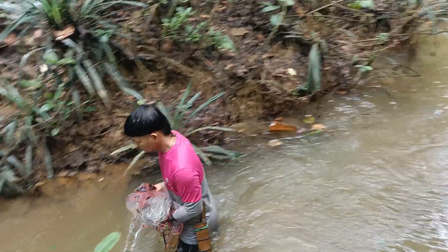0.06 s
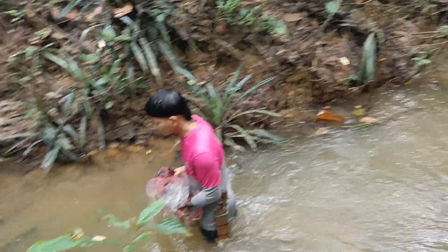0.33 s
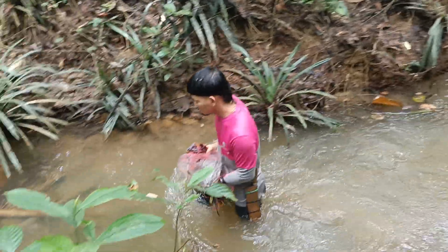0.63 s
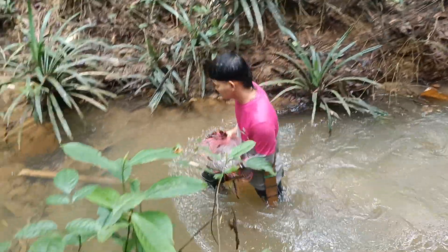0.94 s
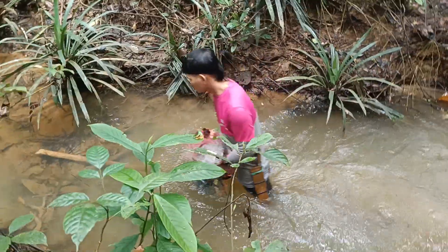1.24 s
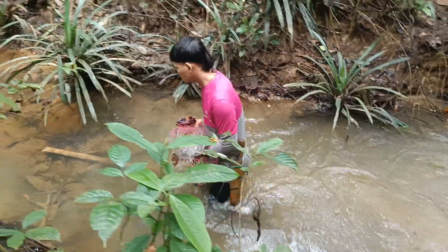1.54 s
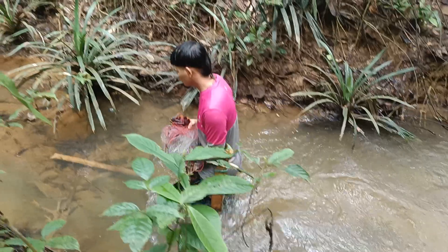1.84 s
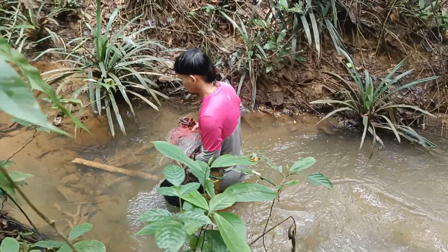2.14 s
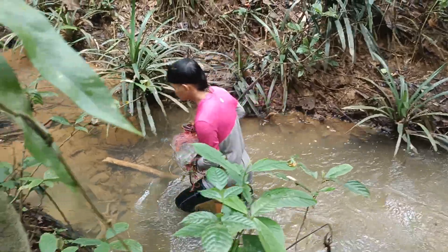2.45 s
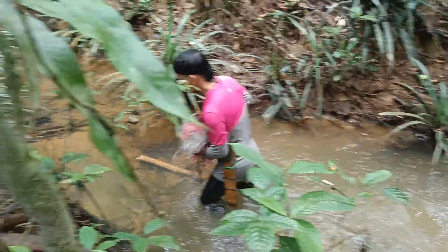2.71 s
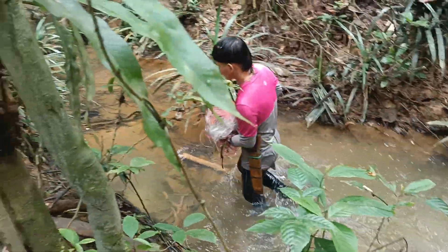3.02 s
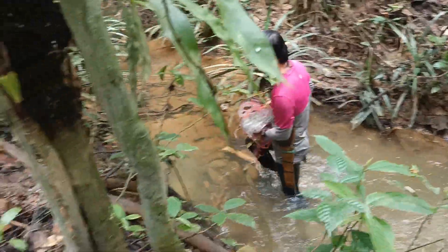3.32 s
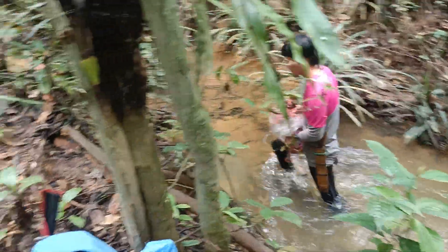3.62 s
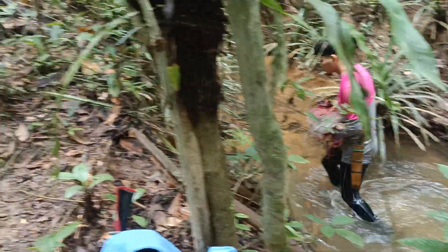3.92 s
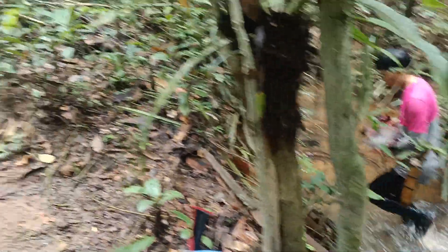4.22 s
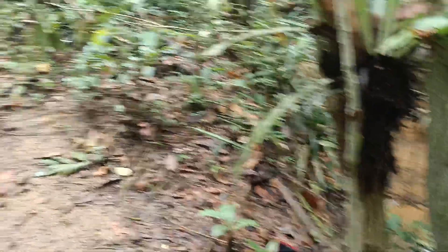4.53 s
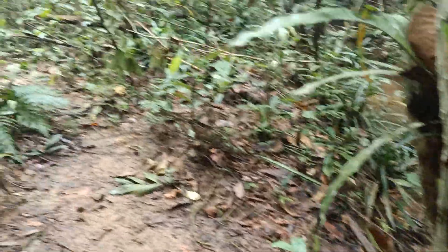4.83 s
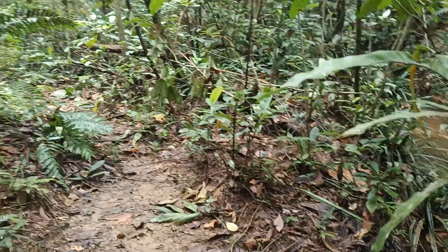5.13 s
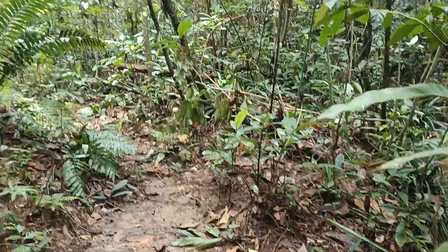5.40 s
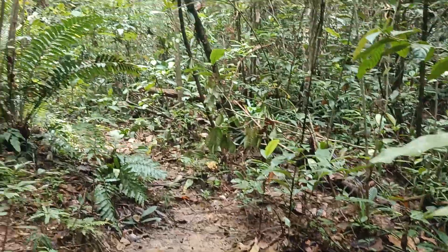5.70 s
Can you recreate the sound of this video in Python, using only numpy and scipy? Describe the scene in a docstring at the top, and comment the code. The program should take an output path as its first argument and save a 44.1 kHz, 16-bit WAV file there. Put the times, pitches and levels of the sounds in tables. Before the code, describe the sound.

Uneven splashing strides through shallow water over a steady insect buzz, followed by twigs and leaves knocking and brushing against the microphone.

```python
"""Sloshing steps come first: someone wades up a shallow forest stream while insects drone all around.
Each stride churns up large gurgling bubbles, small plinking ones and spray; two cicadas join in later.
We listen from a phone carried along the bank a few metres away. Its bearer treads softly,
then turns into the undergrowth, which taps and scrapes the phone."""
import sys
import numpy as np
from scipy import signal
from scipy.fft import rfft, irfft
from scipy.io import wavfile
from scipy.ndimage import uniform_filter1d, map_coordinates

SR = 44100
rng = np.random.default_rng(int(sys.argv[2]) if len(sys.argv) > 2 else 0)


def store_wav(level_fs):
    """Save 16-bit WAV to argv[1]."""
    pcm = np.round(np.clip(np.atleast_2d(level_fs), -1, 1) * 32767)
    wavfile.write(sys.argv[1], SR, pcm.T.astype(np.int16))


N = 254007
TIME = np.arange(N) / SR
FREQS = np.maximum(np.fft.rfftfreq(N, 1 / SR), 1)


def amp(db):
    """Turn decibels into a number to multiply by."""
    return 10 ** (np.asarray(db) / 20)


def pan(side_db):
    """Left and right gains; side_db says how much louder the left is."""
    gains = amp(np.array([[side_db], [-side_db]]) / 2)
    return gains / np.sqrt(np.mean(gains ** 2))


def over_hz(table, column=1):
    """Join the points of a table into a curve over all frequencies."""
    columns = np.transpose(table)
    return np.interp(np.log(FREQS), np.log(columns[0]), columns[column])


def shape(x, gain):
    """Turn each frequency up or down by its own gain."""
    return irfft(rfft(x) * gain, N)


def unit(x):
    """Scale a signal to an average power of 1."""
    return x / np.sqrt(np.mean(x ** 2))


def noise():
    """Separate hiss for left and right."""
    return rng.standard_normal((2, N))


def wander(rate_hz):
    """A smooth random wobble, about 1 in size."""
    return unit(shape(rng.standard_normal(N), np.exp(-(FREQS / rate_hz) ** 2)))


def add(out, start_s, sound):
    """Mix a sound in at the given time."""
    start = max(int(start_s * SR), 0)
    part = sound[..., :max(N - start, 0)]
    out[..., start:start + part.shape[-1]] += part


def ring(hz, decay_s, glide, attack):
    """A note that swells and dies away; a positive glide bends its pitch up."""
    age = np.arange(int(6 * decay_s * SR) + 2) / (decay_s * SR)  # counted in decay times
    swell = (1 - np.exp(-age / attack)) ** 2 * np.exp(-age)
    pitch_hz = hz * np.exp(glide * (age - 1))
    return swell / swell.max() * np.sin(2 * np.pi * np.cumsum(pitch_hz) / SR)


# How the phone's two microphones differ: pitch_hz, side_db, left_lead_radians
MIC_DIFFERENCES = [(300, 0, 0), (650, 0, .25), (880, 9, .5), (1080, 9, -.5), (1320, 5, 1.2), (1550, 2, 2.4),
                   (2100, -2, 2.3), (2800, -6, 1.8), (3400, 0, 1.3), (4200, 2, -1.4), (7000, 0, -2),
                   (12000, -4, -2)]


def two_mics(x):
    """The stream reaches each microphone with a different strength and timing."""
    tilt = amp(over_hz(MIC_DIFFERENCES) / 2)
    left = tilt * np.exp(1j * over_hz(MIC_DIFFERENCES, column=2) / 2)
    return shape(x, np.array([left, 1 / left]) / np.sqrt((tilt ** 2 + tilt ** -2) / 2))


def bubble_cloud(tone, count, cycles, wash_db, churn_db, size_spread=0.54):
    """Many bubbles of random size ring over the rushing wash of torn water."""
    ringing = np.zeros((2, N))
    low_hz, high_hz = tone[0][0], min(tone[-1][0], SR / 4)
    for when, pitch, size, life, side in rng.random((count, 5)):
        hz = low_hz * (high_hz / low_hz) ** pitch
        strength = (1 - .97 * size) ** -size_spread  # many weak, a few strong
        note = ring(hz, cycles * (0.43 + life) / hz, glide=0.0091, attack=0.12)
        add(ringing, when * N / SR, strength * pan(8 * (side - .5)) * note)
    colour = amp(over_hz(tone))
    wash = (noise()[0] + .5 * noise()) * amp(churn_db * wander(120))
    cloud = unit(shape(ringing, colour)) + amp(wash_db) * unit(shape(wash, colour))
    # even out the level: the bubbles of any one moment share the stride's energy
    power = uniform_filter1d(np.mean(cloud ** 2, axis=0), size=2400)
    return two_mics(cloud / np.sqrt(power))


def leg_push(start_s, length_s, attack_s=0.017, build_db_per_s=18, release_s=0.0031, wake_s=0.04):
    """One push grows louder as the leg speeds up, collapses, and leaves a settling wake."""
    age_s = TIME - start_s
    swell = np.clip(age_s / attack_s + .5, 0, 1)
    build = amp(build_db_per_s * (np.clip(age_s, 0, length_s) - length_s / 2))
    after_s = np.maximum(age_s - length_s, 0)
    wake = amp(-5)
    settle = (1 - wake) * np.exp(-after_s / release_s) + wake * np.exp(-after_s / wake_s)
    return swell * build * settle


# The tone of large, medium and small bubbles: pitch_hz, gain_db
GURGLE_TONE = [(150, -42), (290, 2), (420, 8.5), (640, 4.5), (1000, -31.5)]
SPLASH_TONE = [(400, -37), (640, -2), (900, 1.5), (1250, 5.5), (1600, -2), (2400, -78)]
SPRAY_TONE = [(1000, -47), (1700, 6), (2200, 4), (2800, -3), (3200, -7.5), (3750, -14), (4400, -19),
              (5500, -15), (8000, -23.5), (12000, -27.5), (15000, -66)]
# Water lapping at the legs between pushes: gurgle_db, splash_db, spray_db
LAPPING = (-61, -56.5, -63)
# A leg pushes through the water: start_s, length_s, gurgle_db, splash_db, spray_db
LEG_PUSHES = [(0.0, 0.14, -49.5, -43, -45), (0.209, 0.13, -49, -35, -41), (0.308, 0.19, -42.5, -36, -39),
              (0.528, 0.08, -56, -44.5, -45.5), (0.614, 0.16, -48, -38, -43.5),
              (0.809, 0.12, -57.5, -40, -42.5), (0.957, 0.053, -56, -36.5, -38),
              (0.996, 0.024, -47.5, -32, -31.5), (1.39, 0.031, -61, -37.5, -47.5),
              (1.464, 0.012, -38.5, -41, -49), (1.513, 0.04, -58, -43, -48.5),
              (1.571, 0.15, -42.5, -36, -43.5), (1.74, 0.21, -50.5, -40, -42.5),
              (2.036, 0.16, -64, -48.5, -45.5), (2.159, 0.057, -51, -31.5, -31),
              (2.228, 0.068, -45, -39.5, -29.5), (2.46, 0.015, -47, -40, -39),
              (2.508, 0.089, -51.5, -45.5, -45), (2.983, 0.21, -51.5, -53, -53.5),
              (3.176, 0.046, -55, -38.5, -37.5), (3.237, 0.042, -44, -39, -44),
              (3.287, 0.021, -38, -34.5, -41), (3.333, 0.19, -54.5, -45, -43),
              (3.506, 0.16, -40, -40, -37.5), (3.661, 0.12, -44.5, -38, -41),
              (3.842, 0.05, -49, -41.5, -42.5), (4.15, 0.22, -56.5, -43, -47),
              (4.272, 0.2, -39.5, -39, -36.5), (4.454, 0.041, -45.5, -32.5, -31),
              (4.628, 0.034, -41, -31.5, -41), (4.67, 0.021, -52, -48, -40),
              (4.714, 0.012, -65, -57, -45.5), (5.063, 0.024, -45.5, -35.5, -61),
              (5.147, 0.06, -56, -39, -50)]


def wading():
    """Legs churn the water into deep gurgles, splashes and bright spray."""
    effort = amp(LAPPING)[:, None] * np.ones(N)
    for start_s, length_s, *levels_db in LEG_PUSHES:
        effort = np.maximum(effort, amp(levels_db)[:, None] * leg_push(start_s, length_s))
    gurgle_gain, splash_gain, spray_gain = effort
    gurgle = bubble_cloud(GURGLE_TONE, count=800, cycles=5.7, wash_db=-14.5, churn_db=1.0)
    splash = bubble_cloud(SPLASH_TONE, count=1900, cycles=10.2, wash_db=-7, churn_db=5)
    spray = bubble_cloud(SPRAY_TONE, count=4200, cycles=12, wash_db=-3, churn_db=2.5, size_spread=.41)
    churned = gurgle_gain * gurgle + splash_gain * splash + spray_gain * amp(-1.5) * spray
    return churned + fine_drops(spray, spray_gain)


# How strongly the fine drops follow the spray: time_s, gain_db
DROP_AMOUNT = [(0, 11.5), (.4, -24.5), (1.5, 0), (2.15, -23), (2.55, -24), (3.22, -3.5), (3.5, -7.5),
               (4.42, -15.5), (4.63, 6), (4.72, 9)]


def fine_drops(spray, spray_gain, low_hz=3900, high_hz=5760):
    """Thrown water falls back as finer, brighter drops."""
    brighten = np.minimum(FREQS, low_hz) ** 2 / (1 + (FREQS / high_hz) ** 2)
    thrown = spray_gain * amp(np.interp(TIME, *np.transpose(DROP_AMOUNT)))
    return (thrown + slap_bursts()) * unit(shape(spray, brighten))


def bank_echo(x, fade_s, echo_db):
    """Earth banks and trunks scatter a short, dull echo."""
    t = TIME[:SR // 2]
    tail = rng.standard_normal((2, len(t))) * amp(-60 * t / fade_s) * (1 - np.exp(-t / 0.0028))
    tail = signal.sosfilt(signal.butter(1, 3500, fs=SR, output="sos"), tail)
    tail /= np.sqrt(np.sum(tail ** 2) / 2)
    return amp(echo_db) * signal.fftconvolve(x, tail, axes=1)[:, :N]


# The tone of the running stream and forest air: pitch_hz, level_db_per_hz
STREAM_TONE = [(20, -68.5), (90, -76.5), (200, -79), (320, -92), (480, -100), (700, -92), (1100, -90),
               (1600, -104), (2050, -91.5), (2500, -99), (3600, -103), (4800, -107), (7500, -113),
               (10000, -113), (13000, -119), (15500, -132)]


def stream():
    """Running water and forest air make a soft, fluttering murmur."""
    hiss = unit(noise() + 0.33 * noise()[0])
    murmur = shape(hiss, np.sqrt(SR / 2) * amp(over_hz(STREAM_TONE)))
    return two_mics(murmur) * amp(2.65 * wander(24))


# Crowds of singing insects: pitch_hz, width_hz, level_db_per_hz, side_db
INSECT_CHOIRS = [(2960, 227, -85.5, -9.5), (5730, 540, -101, 26), (6224, 295, -89.5, 0.5),
                 (8570, 250, -94, -1), (11740, 490, -97, -7)]


def insects():
    """Many insects blur together into narrow bands of high hiss."""
    out = np.zeros((2, N))
    for hz, width_hz, db, side_db in INSECT_CHOIRS:
        band = np.sqrt(SR / 2) * np.exp(-((FREQS - hz) / width_hz / 2) ** 2)
        out += pan(side_db) * shape(noise(), band) * amp(db + wander(19))
    return out


# The loudest single bubbles and drops: start_s, pitch_hz, level_db, cycles_per_decay
LOUD_BUBBLES = [(0.239, 1240, -11.5, 2), (0.2538, 1030, -16, 1.9), (0.3685, 735, -22, 4),
                (0.3691, 1270, -20, 3.4), (.432, 776, -23, 7), (.458, 690, -23, 1.7),
                (0.4579, 1350, -24, 4), (0.483, 1280, -20.5, 2.7), (.635, 318, -30.5, 2.7),
                (0.658, 980, -24, 2.4), (.76, 630, -38, 4.5), (.821, 2800, -26.5, 10),
                (.823, 822, -27, 17.3), (.905, 1180, -28, 6.3), (.92, 1220, -29.5, 4.6),
                (0.9575, 856, -29, 8.7), (1.123, 1046, -37, 12), (1.256, 2140, -27.5, 17),
                (1.355, 1020, -37.5, 8.3), (1.53, 2580, -34.5, 19), (1.553, 1314, -27.5, 8.5),
                (1.577, 1135, -26.5, 9.1), (1.613, 1000, -30, 5.6), (1.67, 1130, -20.5, 5.3),
                (1.761, 1224, -26.5, 11), (1.879, 1017, -28, 6.9), (1.889, 1224, -22.5, 5.1),
                (1.934, 1176, -30, 9.7), (2.105, 1200, -31, 7.7), (2.163, 550, -30, 5.1),
                (2.201, 486, -29.5, 6.9), (2.243, 1860, -11, 2.5), (2.274, 2026, -18, 21),
                (2.34, 4730, -32, 6.7), (2.34, 1280, -27.5, 6.3), (2.362, 1316, -31, 5.6),
                (2.409, 786, -40.5, 10.4), (2.593, 1324, -34, 9.3), (2.917, 916, -32, 9.4),
                (2.974, 2540, -41.5, 19), (3.025, 1070, -30.5, 6), (3.064, 1060, -33.5, 5.8),
                (3.095, 1258, -39, 30), (3.183, 1077, -29, 8.8), (3.218, 1130, -25, 6.5),
                (3.226, 283, -25, 1.6), (3.295, 770, -29.5, 3), (3.45, 1365, -28, 12.6),
                (3.489, 758, -30.5, 11.6), (3.623, 339, -24.5, 6.5), (3.644, 2630, -34.5, 84),
                (4.137, 3320, -36.5, 5), (4.199, 1103, -27, 5.6), (4.1982, 2820, -27.5, 6.1),
                (4.449, 232, -32, 3.8), (4.469, 853, -23.5, 6), (4.478, 2650, -20.5, 8.4),
                (4.639, 1055, -26.5, 12), (4.659, 1350, -19.5, 3.7), (4.709, 2860, -18.5, 3.4),
                (4.7255, 2770, -26, 5.4), (5.0628, 1450, -14, 1.7), (5.072, 1110, -22, 2.7)]


def single_bubbles():
    """Bubbles ring and rise a little in pitch; those that burst at once just plop or tick."""
    out = np.zeros(N)
    for start_s, hz, db, cycles in LOUD_BUBBLES:
        add(out, start_s, amp(db) * ring(hz, cycles / hz, glide=0.02, attack=0.18))
    return out


def waver(x, rate_hz=80, shift_s=0.0001, depth_db=2.5):
    """Heaving water makes bubbles wobble in pitch and loudness."""
    bent = map_coordinates(x, [(TIME + shift_s * wander(rate_hz)) * SR])
    return bent * amp(depth_db * wander(rate_hz))


# Footfalls and jolts that reach the phone: start_s, pitch_hz, level_db, side_db
BUMPS = [(0.341, 163, -33, -16), (0.7841, 202, -24.5, -14), (1.054, 196, -28.5, -16),
         (1.5759, 233, -23, -13), (1.7042, 187, -21, -13), (4.645, 187, -25, -14), (4.826, 196, -28, -17),
         (5.2293, 189, -18, -11), (5.287, 240, -22.5, 6), (5.392, 186, -13, -4), (5.458, 176, -22, -20),
         (5.625, 187, -22, -5)]


def thuds():
    """Soft blows sink in pitch as they die; the heaviest also rocks the whole phone."""
    out = np.zeros((2, N))
    for start_s, hz, db, side_db in BUMPS:
        gain = amp(db) * pan(side_db)
        add(out, start_s, -gain * ring(hz, decay_s=1 / hz, glide=-0.066, attack=0.37))
        add(out, start_s, gain * 0.25 * ring(1.81 * hz, decay_s=0.61 / hz, glide=-0.15, attack=0.95))
    rocking = ring(hz=47, decay_s=0.014, glide=-0.12, attack=0.23)
    add(out, start_s=5.396, sound=amp(-13.5) * pan(29) * rocking)
    return out


# A leg slaps the surface: start_s, level_db
LEG_SLAPS = [(0.999, -29), (1.397, -32.5), (2.339, -29), (3.274, -31.5)]


def slap_bursts(attack_s=0.0041, decay_s=0.01):
    """The jump in loudness of the fine drops as each slap throws up a sheet of them."""
    gain, t = np.zeros(N), TIME[:SR // 4]
    burst = (1 - np.exp(-t / attack_s)) * np.exp(-t / decay_s)
    for start_s, db in LEG_SLAPS:
        add(gain, start_s, amp(db) * burst)
    return gain


# Leaves and twigs hit the phone: start_s, pitch_hz, level_db, side_db
TWIG_TAPS = [(1.693, 3200, -0.5, -36), (1.6938, 3670, -20, -23), (4.9548, 1240, -9, -35),
             (4.954, 4440, -11.5, -42), (5.002, 9500, -24.5, -25), (5.142, 10700, -20.5, -27),
             (5.2309, 1640, 0.5, 19), (5.2317, 504, -8, 4), (5.2448, 895, -4, -36), (5.296, 11900, -35, 10),
             (5.392, 1310, -19, 14), (5.393, 10700, -25, 5), (5.392, 4030, -18, 7),
             (5.4329, 636, -2.5, -23), (5.4896, 3040, -1, -45), (5.6289, 1210, -12, 14)]


def twig_taps(width_share=1.27, widest_hz=4500):
    """A twig flicks the case near one microphone: one quick swing, rounded by the soft contact."""
    out, t = np.zeros((2, N)), TIME[:SR // 50]
    for start_s, hz, db, side_db in TWIG_TAPS:
        width_hz = min(width_share * hz, widest_hz)  # a wider band dies sooner
        top_hz = min(4 * hz, 4000 + 1.4 * hz, 14000)
        swing = np.exp(-np.pi * width_hz * t / 2) * np.sin(2 * np.pi * hz * t)
        swing = signal.sosfilt(signal.butter(1, hz / 3, "high", fs=SR, output="sos"), swing)
        swing = signal.sosfilt(signal.butter(4, top_hz, fs=SR, output="sos"), swing)
        gains = pan(side_db)
        add(out, start_s, amp(db) * gains / gains.max() * swing / np.abs(swing).max())
    return out


# Pockets of air close behind a leg: start_s, length_s, pitch_hz, level_db
AIR_POCKETS = [(1.761, 0.035, 420, -33.5), (1.983, 0.052, 416, -33.5), (2.267, 0.081, 467, -33.5),
               (2.455, 0.062, 358.3, -27.5), (3.06, 0.023, 433, -30), (3.752, 0.039, 360, -33)]


def glugs(rise_share=0.15):
    """A large pocket of air swells into a round, rising note."""
    out = np.zeros(N)
    for start_s, length_s, hz, db in AIR_POCKETS:
        progress = np.linspace(0, 1, int(length_s * SR))
        phase = 2 * np.pi * np.cumsum(hz * (1 + rise_share * (progress - .5))) / SR
        add(out, start_s, amp(db) * np.sin(np.pi * progress) ** 2 * np.sin(phase))
    return out


# One list of points for each cicada: time_s, pitch_hz, level_db
CICADA_SONGS = [
    [(2.5, 9000, -100), (3.0, 9050, -61.5), (4.25, 9060, -64.5), (4.7, 9000, -100)],
    [(4.15, 7600, -100), (4.35, 8000, -83), (4.6, 7860, -76), (5.3, 8100, -102.5)],
]


def cicadas():
    """Two nearer cicadas each swell and fade on a high, rough note."""
    out = np.zeros((2, N))
    for song in CICADA_SONGS:
        time_s, hz, db = np.transpose(song)
        note = np.cos(2 * np.pi * np.cumsum(np.interp(TIME, time_s, hz)) / SR)
        roughness = unit(shape(noise(), np.exp(-(FREQS / 160) ** 2)))
        out += amp(np.interp(TIME, time_s, db)) * pan(-5) * roughness * note
    return out


# The tone of the three parts of a scrape: pitch_hz, gain_db
CASE_TONE = [(150, -15), (450, -3.5), (1000, 8), (1700, 11.5), (2400, 7), (3000, -22), (5000, -31),
             (9000, -30), (15000, -70)]
HISS_TONE = [(800, -9), (1700, 1.5), (3000, 5.5), (5200, 5), (6300, -5.5), (8000, -14), (12500, -25),
             (15000, -27)]
RUMBLE_TONE = [(20, -16), (45, 10.5), (90, 1), (190, 3), (350, 2), (700, -5), (2000, -62)]
# Leaves drag over the phone: start_s, end_s, level_db, side_db, hiss_gain_db, rumble_gain_db
LEAF_SCRAPES = [(5.18, 5.466, -45, 8, -11, 1.5), (5.203, 5.27, -37, -22, -6.5, 7),
                (5.25, 5.27, -18, 14, -29, -7), (5.278, 5.347, -34, 16, -10, 1),
                (5.382, 5.402, -31, 7, -21, 7), (5.426, 5.501, -33, 7, -16, -1.5),
                (5.474, 5.638, -32.5, 20, -3, -14), (5.602, 5.676, -27, 16.5, -18, -4.5)]


def leaf_scrapes(slips_per_s=14000, fade_share=0.33):
    """Leaves stick and slip in tiny clicks that ring the case, hiss and shake the phone."""
    slips = (rng.random((2, N)) < slips_per_s / SR) * rng.standard_normal((2, N))
    # the case carries the low part of each slip to both microphones
    slips = slips + shape(slips[::-1], 1 / (1 + (FREQS / 600) ** 4))
    case = unit(shape(slips, amp(over_hz(CASE_TONE))))
    hiss = unit(shape(slips, amp(over_hz(HISS_TONE))))
    rumble = unit(shape(noise() + 0.56 * noise()[0], amp(over_hz(RUMBLE_TONE))))
    out = np.zeros((2, N))
    for start_s, end_s, db, side_db, hiss_db, rumble_db in LEAF_SCRAPES:
        fade_s = fade_share * (end_s - start_s)
        contact = np.clip(np.minimum(TIME - start_s, end_s - TIME) / fade_s + 0.19, 0, 1)
        rubbing = pan(side_db) * (case + amp(hiss_db) * hiss)
        out += amp(db) * contact * (rubbing + amp(rumble_db) * rumble)
    return out


def scene():
    """Water below the bank, bumps and leaves at the phone, forest all round."""
    water = wading() + two_mics(waver(single_bubbles() + glugs()))
    echo = bank_echo(water, fade_s=0.45, echo_db=-16.5)
    at_phone = thuds() + twig_taps() + leaf_scrapes()
    forest = stream() + insects() + cicadas()
    return water + echo + at_phone + forest


def record(dry):
    """The phone rounds off the loudest peaks and cuts the highest treble."""
    treble_cut = signal.ellip(8, .2, 70, 15400, fs=SR, output="sos")
    return signal.sosfilt(treble_cut, np.tanh(dry))


dry = scene()
out = record(dry)
store_wav(out)
```